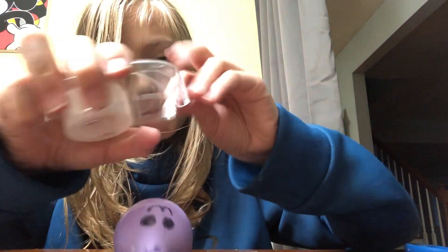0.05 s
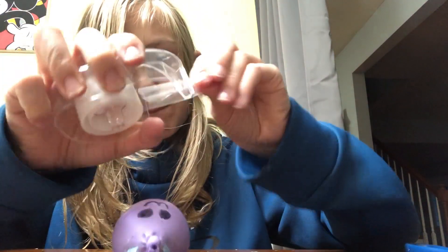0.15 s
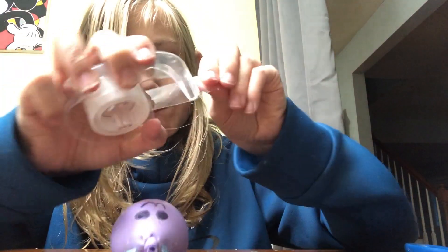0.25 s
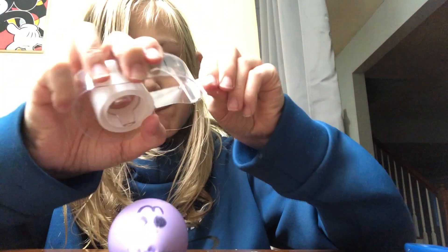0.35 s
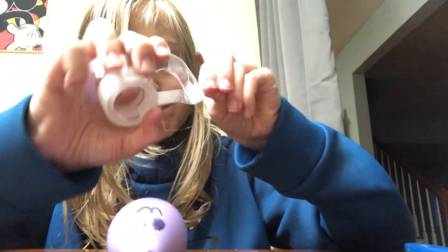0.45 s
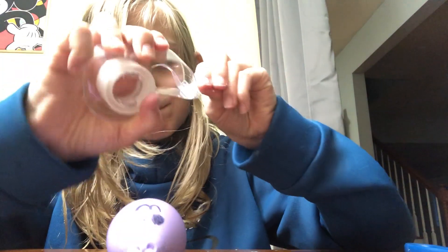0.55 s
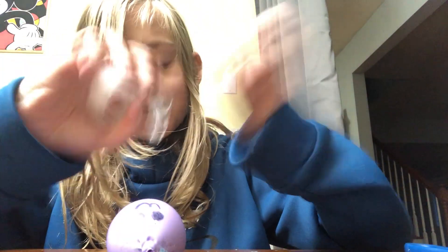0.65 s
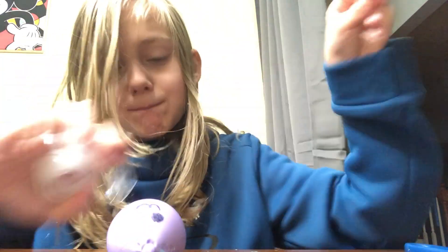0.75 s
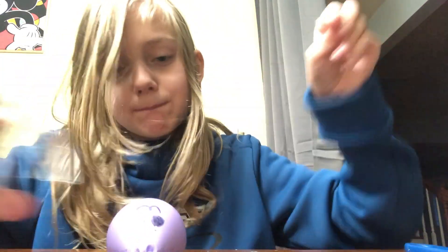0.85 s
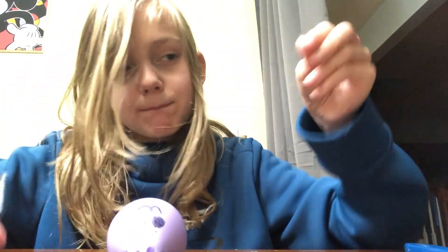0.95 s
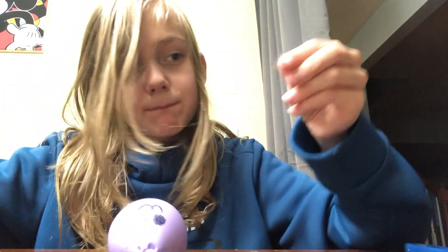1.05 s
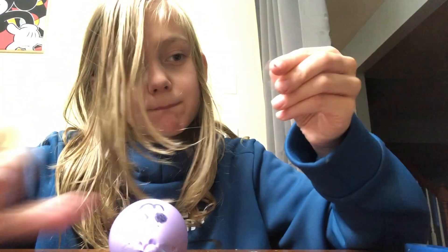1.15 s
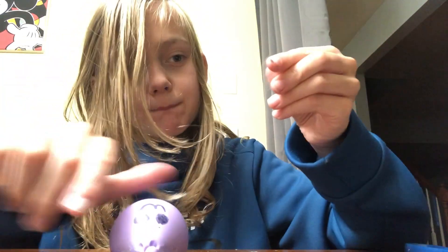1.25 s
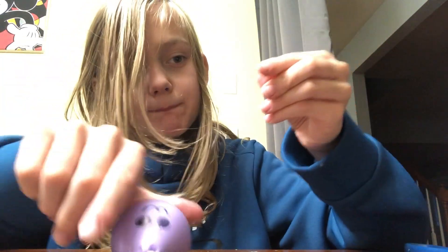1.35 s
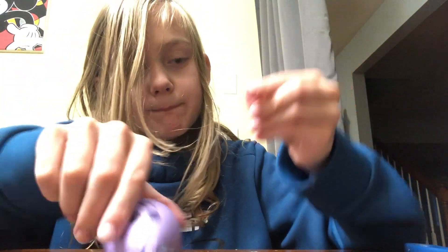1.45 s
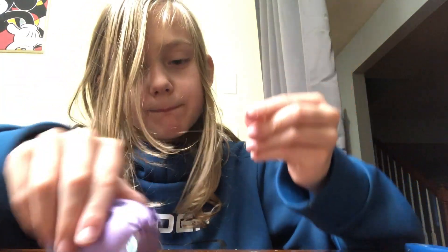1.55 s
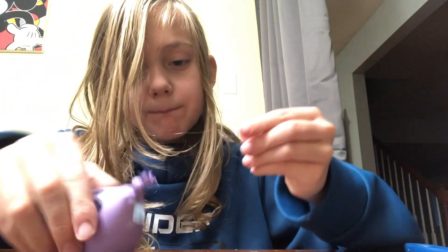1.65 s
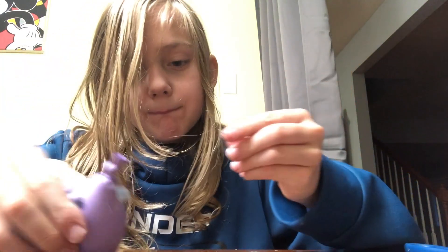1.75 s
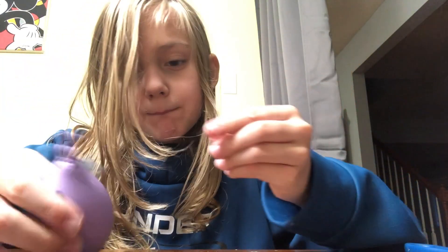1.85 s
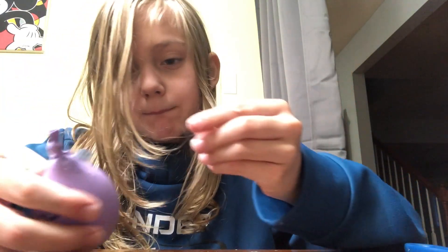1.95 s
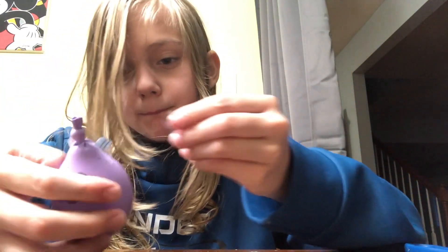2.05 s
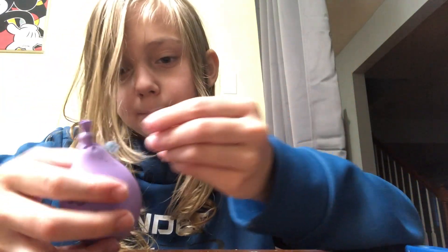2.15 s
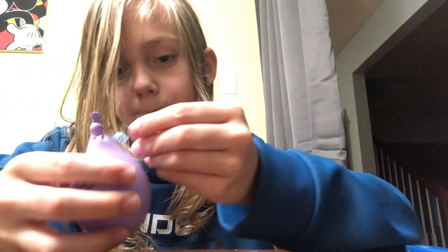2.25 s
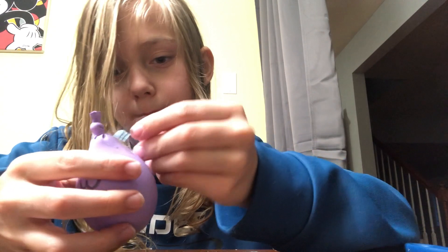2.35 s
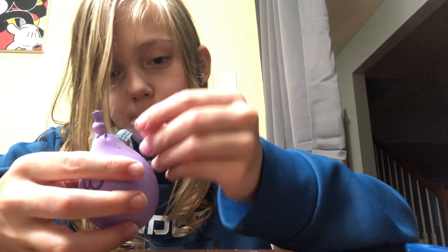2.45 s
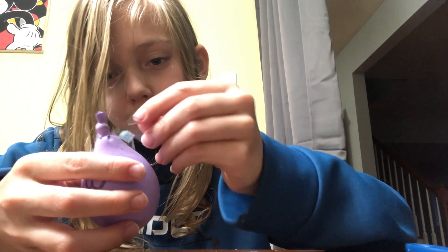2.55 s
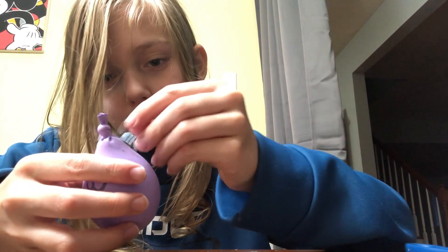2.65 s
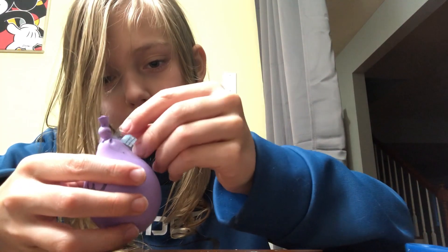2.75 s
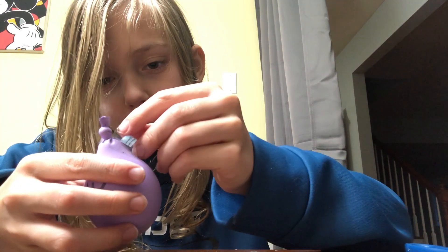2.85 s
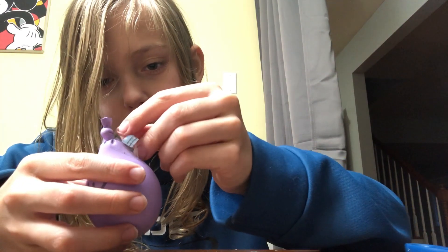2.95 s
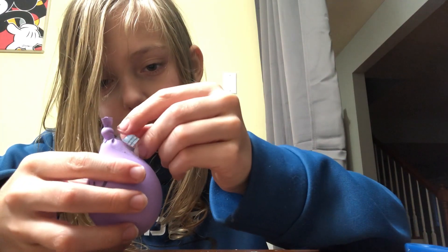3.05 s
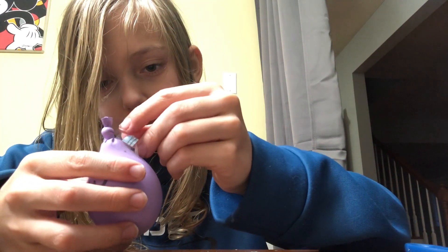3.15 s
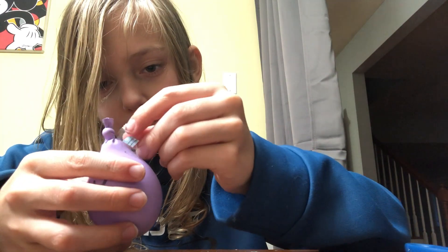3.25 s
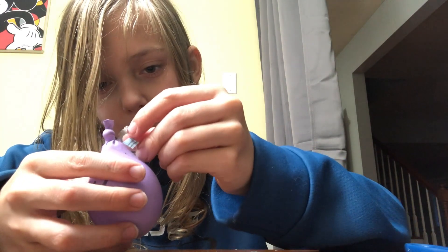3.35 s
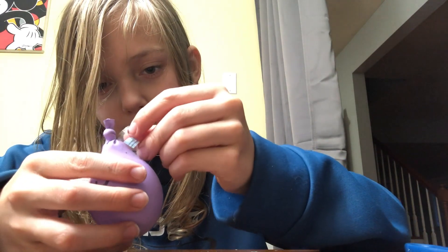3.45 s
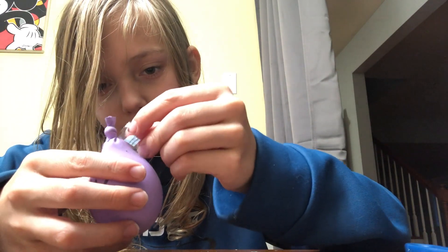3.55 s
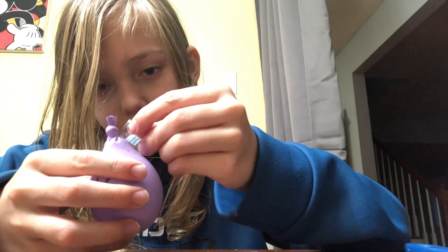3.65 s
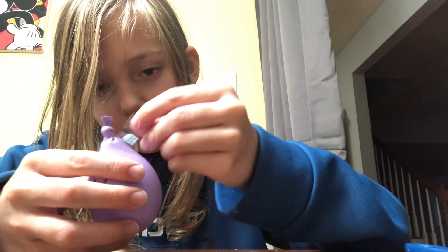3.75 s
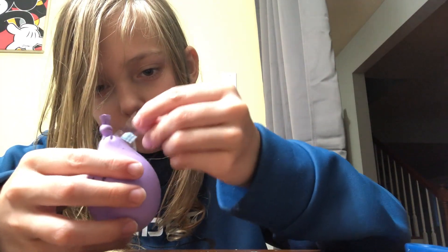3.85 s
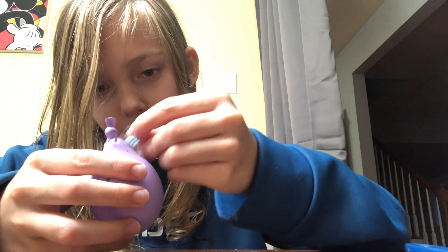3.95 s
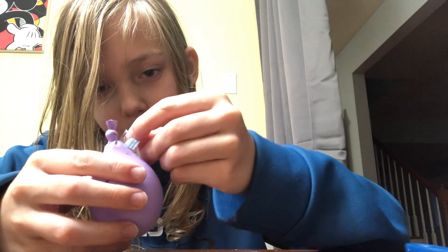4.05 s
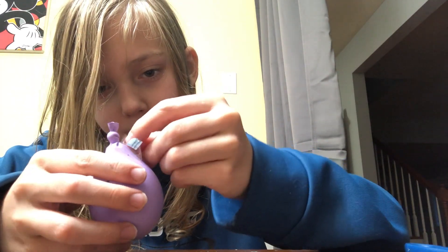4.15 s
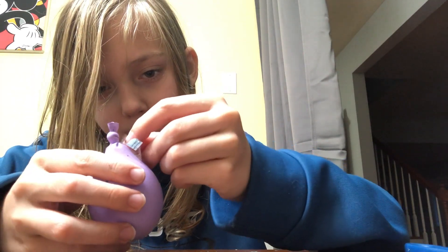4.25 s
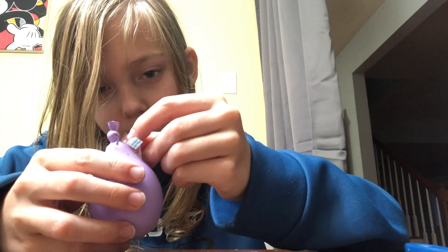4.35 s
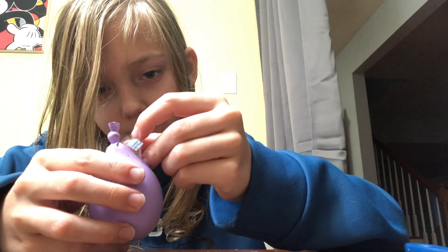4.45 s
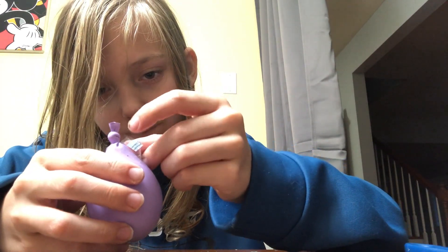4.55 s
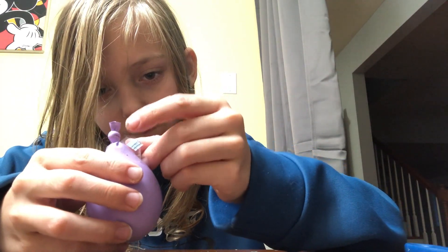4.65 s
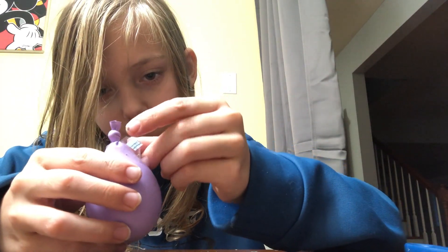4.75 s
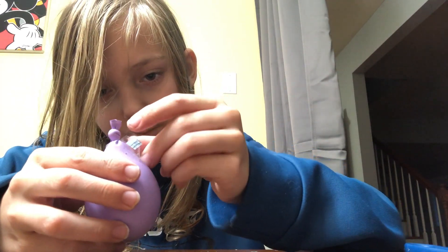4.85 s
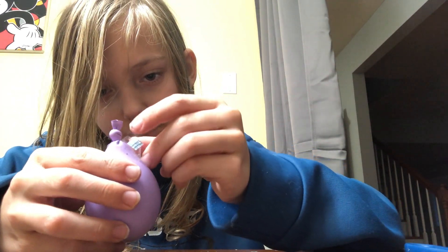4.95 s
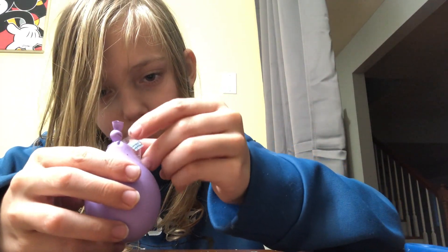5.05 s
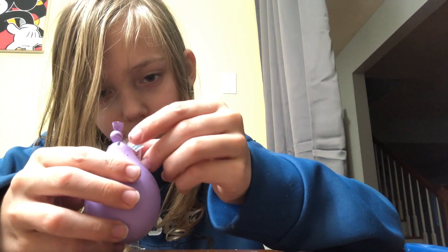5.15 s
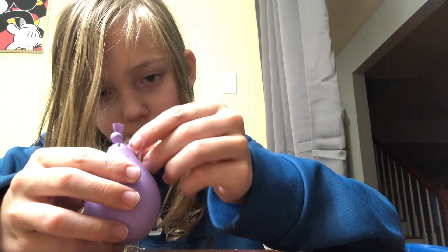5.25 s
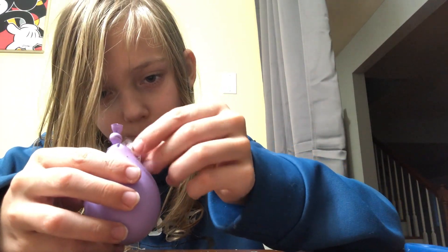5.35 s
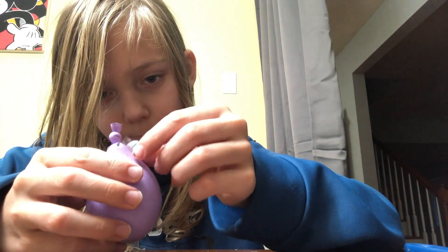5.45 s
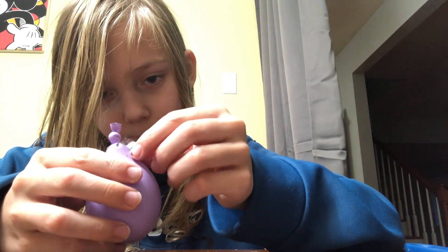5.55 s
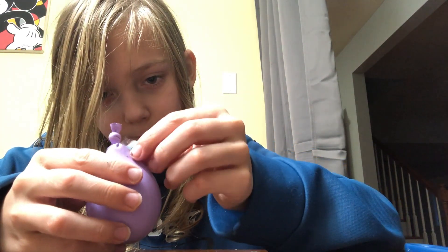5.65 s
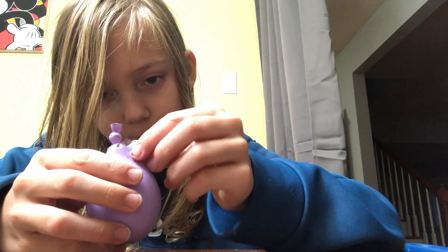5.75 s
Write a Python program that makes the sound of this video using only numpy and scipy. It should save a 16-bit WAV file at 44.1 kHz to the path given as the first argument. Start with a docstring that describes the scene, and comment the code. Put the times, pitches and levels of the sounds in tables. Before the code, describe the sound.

Short crackling squeaks of sticky tape come first, then a bright rip on a metal cutter that the room answers. Low arm rumble, then the hollow dispenser knocks and rocks on the table. The rest is nearly silent: faint air and hum, light finger ticks, crinkling rubs, and a single small snap midway, all heard close to a phone.

```python
"""Close to a phone in a small quiet room with faint air and hum, sticky tape creaks off a plastic dispenser:
fine crackle, and jerks that ring it. It ticks, is tapped, rustles, and tears on the cutter in filtered cracks.
Moving arms give low rumble and boom; the dispenser lands in cracks, ringing shell modes and table thumps.
A sleeve brushes, then fingers press the strip onto a small balloon: ticks, crinkling rubs and one sharp snap."""
import sys
import numpy as np
from scipy import signal
from scipy.fft import rfft, irfft, next_fast_len
from scipy.io import wavfile

SR = 44100
rng = np.random.default_rng(int(sys.argv[2]) if len(sys.argv) > 2 else 0)


def to_wav(sig):
    """Store sig (one row per channel, or 1-D mono) as 16-bit WAV at the path in sys.argv[1].

    Samples outside -1..1 are clipped; the rate is SR.
    """
    pcm = np.clip(np.atleast_2d(sig), -1, 1) * 32767
    pcm = np.round(pcm).astype(np.int16)
    wavfile.write(sys.argv[1], SR, pcm.T)  # frames by channels


N = 255780
TIME_S = np.arange(N) / SR

# still air, relative spectrum: freq_hz, density_db
AIR_COLOUR = [(42, -12), (60, -7.5), (95, -11.5), (130, -7), (200, -8), (250, -6.5), (350, -10.5),
              (480, -11.5), (620, -14), (950, -19), (2500, -25), (7500, -27.5), (8600, -31), (16000, -36.5)]
AIR_DB = -69
# low hum: freq_hz, width_hz, level_db
DRONES = [(66.5, 8, -82), (129.4, 17, -74)]
# reverberation: freq_hz, t60_s
ROOM_T60 = [(150, 0.63), (1000, 0.75), (3500, 0.5), (8000, 0.49), (15000, 0.33)]
ROOM_MODE_HZ = 62  # lowest standing wave

# film peeling on the hollow dispenser: freq_hz, gain_db
PEEL_COLOUR = [(100, -18.5), (500, -10.5), (1400, -13.5), (2200, -6.5), (3000, -1.5), (4200, -8),
               (6400, -10.5), (10000, -16.5), (16000, -24.5)]
# tugs on the roll: start_s, level_db, attack_s, fade_s
PULLS = [(-.005, -40.5, .005, 0.053), (.122, -47.5, .02, 0.033)]
# jerks of the glue: start_s, level_db, ring_hz, film_hiss_db (re ring)
SLIPS = [(.0088, -31, 3127, -13.5), (.0104, -32, 3052, -9), (.072, -42, 2502, -8),
         (.0859, -31, 2756, -11.5), (.1149, -37, 3888, -6), (.118, -39.5, 2448, -4), (.149, -42, 2100, 4),
         (.188, -52, 2700, 0)]
# hiss of the film in a jerk: freq_hz, gain_db
SLIP_FILM_COLOUR = [(400, -5.5), (1000, 1.5), (5000, -2.5), (8000, -2.0), (11000, -12.5), (14000, -30)]

# sticky strip catches and lets go: start_s, level_db, brightness_db_per_band
TICKS = [(0.181, -60, -8.5), (.21, -61, -6), (.236, -52.5, 1), (0.26, -56, -5.5), (0.521, -59, 3),
         (.595, -63.5, -9), (.634, -61, 0.5), (0.99, -64.5, -0.5), (1.224, -54.5, 1.5), (1.431, -62, -3),
         (1.799, -73, 8), (1.8774, -53, -2.5), (3.0736, -63.5, 6), (3.37, -68.5, -4), (3.575, -66.5, -12),
         (3.606, -71.5, -10.5), (3.966, -70, 2.5), (4.1205, -58, 6), (4.1608, -52, -0.5), (4.549, -63, 7.5),
         (4.605, -69.5, -2.5), (4.726, -65.5, -2), (4.951, -74.5, 6.5), (5.402, -67.5, -4.5),
         (5.434, -62, 1), (5.4994, -58, 3), (5.513, -56.5, 2.5), (5.5238, -57, 5), (5.548, -67.5, 7.5),
         (5.688, -69, -5)]
# tick bands: from_hz, to_hz
TICK_BANDS_HZ = [(650, 2400), (2000, 5600), (6800, 12000)]
# level of each band in a neutral tick: low_db, mid_db, high_db
TICK_BAND_DB = (0.5, 0.5, -0.5)
TICK_FADES_S = (.0022, .0014, .001)

# finger taps on hard plastic: start_s, level_db
TAPS = [(0.2655, -53.5), (1.406, -50), (1.605, -55)]
# tapped plastic: freq_hz, level_db, t60_s
TAP_MODES = [(892, -3.5, .025), (1900, -0.5, 0.04), (2150, -7.5, .03), (2700, -2, .035),
             (3159, -6.5, 0.018)]

# faint rustles of the strip, before and after the tear: centre_s, length_s, level_db
RUSTLES = [(.57, .14, -72), (.652, .016, -52.5), (.83, .05, -60.5), (.915, 0.033, -65), (.975, .04, -70),
           (1.22, .16, -68.5)]
# rustling strip: freq_hz, gain_db
STRIP_COLOUR = [(400, -8.5), (1500, -3.5), (3500, 1), (6000, -2.5), (9000, -4.5), (11000, -11), (13500, -5),
                (16000, -8.5)]
# hand and sleeve take up the balloon: centre_s, length_s, level_db
BRUSHES = [(1.445, 0.08, -65), (1.71, 0.16, -68.5), (1.855, 0.073, -70.5)]
# sleeve cloth: freq_hz, gain_db
SLEEVE_COLOUR = [(100, -11.5), (230, 0.5), (500, -3.5), (1500, -11), (4000, -10), (8000, -16),
                 (16000, -32.5)]
# fingertips rub the strip: centre_s, length_s, level_db
RUBS = [(3.474, .08, -72), (4.123, 0.017, -59), (4.435, 0.081, -68.5), (4.53, 0.041, -61),
        (5.401, 0.051, -71.5), (5.514, 0.052, -63)]
# rubbing: freq_hz, gain_db
RUB_COLOUR = [(300, 10.5), (1200, -6), (3000, -5.5), (6000, -12), (8500, 2), (11500, -11.5), (13500, -28),
              (16000, -8)]
# crinkling under the fingertips: freq_hz, gain_db
CRINKLE_COLOUR = [(280, -1), (480, 8), (1200, 0), (3000, 3), (6000, -12), (10000, -6), (14500, -9)]
CRINKLE_DB = -4.5  # re rubbing

# tear across the cutter's teeth: start_s, level_db, fade_s, cutter_ring_db
TEAR = [(.6553, -33.5, 0.00064, -44), (.6559, -12.5, 0.0012, -21), (0.6593, -17, .0022, -25),
        (0.6619, -28, 0.0017, -24.5)]
# tear heard directly: freq_hz, gain_db
TEAR_COLOUR = [(150, -36), (280, -25.5), (500, -3), (750, -8.5), (1100, -10.5), (1750, 1.5), (2700, -1.5),
               (4500, -5), (6000, -3), (8500, 3), (11500, -13), (16000, -13)]
# tear sent to the walls, all directions: freq_hz, gain_db
TEAR_SPREAD_COLOUR = [(200, -9), (600, -2.5), (850, -10), (1400, -6.5), (1850, 0.5), (2500, -1), (3600, 6),
                      (4500, -4.5), (5900, 0), (6900, -3), (8000, -0.5), (10000, -5), (12000, -12),
                      (16000, -14)]
# metal cutter: freq_hz, level_db, t60_s
CUTTER_MODES = [(5930, 1, 0.018), (6100, -3, 0.011), (7400, -0.5, 0.0073), (10185, -9, 0.0042)]

# low rumbles of moving arms and of the hand setting the dispenser down:
# start_s, relative_level_db, attack_s, fade_s
RUMBLES = [(.655, -43.5, .115, .05), (.83, -61, .1, .1), (1.06, -59, .04, .055)]
# rumble: freq_hz, gain_db
RUMBLE_COLOUR = [(40, -16), (60, -6), (90, -9), (125, -0.5), (175, 1.5), (260, -8), (450, -23.5),
                 (1000, -52.5)]

# dispenser lands and rocks: start_s, contact_strength_db
LANDING = [(1.0308, -36), (1.0332, -25.5), (1.034, -36), (1.054, -39.5), (1.0613, -16), (1.065, -26),
           (1.0736, -22.5), (1.082, -21.5), (1.086, -28.5), (1.097, -35.5)]
# contact crack and roll chatter: freq_hz, gain_db
CRACK_COLOUR = [(170, -22), (280, -11.5), (500, -10.5), (1000, -1), (1800, -1.5), (2200, -3.5), (2800, 2.5),
                (4300, 2.5), (5200, -8.5), (7300, -5.5), (9500, -17.5), (12000, -32), (16000, -37)]
# plastic shell: freq_hz, level_db, t60_s
SHELL_MODES = [(1160, -17.5, 0.13), (1590, -17.5, 0.17), (1910, -10.5, 0.24), (2590, -11, .07),
               (2700, -13, 0.099), (2867, -0.5, .08), (2993, -2.5, 0.047), (3090, -3.5, .15),
               (3180, 0, 0.31), (3010, -5, .08), (3587, -11.5, .06), (4036, -11.5, 0.0793),
               (4090, -15, 0.24), (4550, -15.5, 0.41), (4660, -12.5, .2), (5857, -14, 0.042),
               (6380, -10, 0.066), (6957, -18, 0.071)]
# table top: freq_hz, level_db, t60_s
TABLE_MODES = [(183.6, -16, .14), (243.5, -3.5, .17), (300.44, -4.5, 0.1), (391, -4.5, 0.28),
               (458.3, 0, 0.11), (524, -2, .1), (633, -4, .13), (696, 0, 0.14), (794, -6.5, 0.085)]
CHATTER_DB = -7  # roll's rattle, re each crack
SHELL_DB, SHELL_DB_PER_DB = 4.5, 1.7  # ring re hardest crack; growth with strength
THUMP_DB, THUMP_DB_PER_S = -15.5, 200  # re each crack; grows as the weight settles

# strip buckles against the balloon: start_s, level_db, fade_s, balloon_ring_db
SNAP = [(3.7243, -41.5, .001, -49), (3.7265, -29.5, 0.00043, -30), (3.7281, -38, 0.0014, -45)]
# snap heard directly: freq_hz, gain_db
SNAP_COLOUR = [(150, -32.5), (400, -18), (650, -24), (1120, 2), (2000, -24.5), (3000, -13), (4300, -12),
               (6200, -12.5), (7400, -1.5), (10000, -6), (13000, -10.5), (16000, -30)]
# snap sent to the walls, all directions: freq_hz, gain_db
SNAP_SPREAD_COLOUR = [(200, 1), (450, 4.5), (700, -4), (1100, 6), (1500, -10), (1900, 1), (2400, -4),
                      (3000, 3.5), (4400, -6), (5500, 0), (6300, -9), (7200, 2), (9000, -7), (16000, -15)]
# balloon: freq_hz, level_db, t60_s
BALLOON_MODES = [(1130, -7.5, 0.015), (1790, -6, 0.013), (2180, -19.5, 0.0083), (2960, -2, 0.0092),
                 (3520, -9, 0.0097)]

TOP_HZ = 16200  # treble limit of the phone


def undb(db):
    """Decibels to gain."""
    return 10 ** (np.asarray(db) / 20)


def unit(x):
    """Scale to rms 1."""
    return x / np.sqrt(np.mean(x ** 2))


def blow(x):
    """Scale a short sound to the energy of 4 ms at rms 1."""
    return x / np.sqrt(np.sum(x ** 2) / (.004 * SR))


def on_log(hz, points):
    """Read (freq_hz, value) points on a log frequency axis."""
    point_hz, value = np.transpose(points)
    return np.interp(np.log(hz + 1), np.log(point_hz), value)


def colour(x, points):
    """Minimum-phase filter of the given (freq_hz, gain_db) shape, falling off below its first point."""
    size = 2 * next_fast_len(len(x))
    hz = np.arange(size // 2 + 1) * SR / size
    low_cut = np.minimum((hz + 1) / points[0][0], 1) ** 3
    gain = undb(on_log(hz, points)) * low_cut
    # folding the cepstrum makes the filter causal
    cepstrum = irfft(np.log(gain))[:size // 2]
    cepstrum[1:] *= 2
    response = np.exp(rfft(cepstrum, size))
    return irfft(rfft(x, size) * response)[:len(x)]


def add(track, start_s, sound):
    """Mix a sound into the track."""
    start = max(int(start_s * SR), 0)
    track[start:start + len(sound)] += sound[:N - start]


def crack(fade_s, scatter, size=4096):
    """One spike plus a dying surface flutter; scatter is flutter over spike in amplitude (root energy)."""
    t = TIME_S[:size]
    flutter = rng.standard_normal(size) * np.exp(-t / fade_s)
    return (t == 0) + scatter * flutter / np.sqrt(np.sum(flutter ** 2))


def crackle(per_s, spread_db):
    """Random tiny clicks, sizes scattered evenly over a range in dB."""
    hits = rng.random(N) < per_s / SR
    return hits * rng.choice([-1, 1], N) * undb(spread_db * rng.random(N))


def ring(modes, detune, size=22050):
    """Decaying modes, each struck at its peak with random sign and slight relative detuning."""
    t = TIME_S[:size]
    out = np.zeros(size)
    for hz, db, t60_s in modes:
        amplitude = undb(db) * rng.choice([-1, 1])
        struck_hz = hz * (1 + detune * rng.standard_normal())
        out += amplitude * np.cos(2 * np.pi * struck_hz * t) * np.exp(-np.log(1000) * t / t60_s)
    return blow(out)


def strokes(rows):
    """Gain of soft Gaussian strokes: centre_s, length_s, level_db."""
    return sum(undb(db) * np.exp(-(2 * (TIME_S - centre_s) / length_s) ** 2)
               for centre_s, length_s, db in rows)


def surges(rows):
    """Gain of moves that build up linearly, then fade: start_s, level_db, attack_s, fade_s."""
    gain = np.zeros(N)
    for start_s, db, attack_s, fade_s in rows:
        attack = np.clip((TIME_S - start_s) / attack_s, 0, 1)
        fade = np.exp(-np.maximum(TIME_S - start_s - attack_s, 0) / fade_s)
        gain += undb(db) * attack * fade
    return gain


def echoes(x, wet_db, delay_s=.007, early=1.6, early_fade_s=0.038, size=32768):
    """Diffuse noise tail, stronger early on, each band decaying at its own t60."""
    t, hz = TIME_S[:size], np.arange(size // 2 + 1) * SR / size
    centres_hz = np.geomspace(125, 16000, 8)
    noise, tail = rfft(rng.standard_normal(size)), np.zeros(size)
    for centre_hz, own in zip(centres_hz, np.eye(len(centres_hz))):
        band = irfft(noise * np.interp(hz, centres_hz, own))
        tail += band * np.exp(-np.log(1000) * t / on_log(centre_hz, ROOM_T60))
    onset = np.clip(t / delay_s - .5, 0, 1)  # half open at delay_s
    tail = tail * onset * (1 + early * np.exp(-t / early_fade_s))
    return undb(wet_db) * signal.fftconvolve(x, tail / np.sqrt(np.sum(tail ** 2)))[:N]


def room(x, wet_db):
    """Sound plus its echoes."""
    return x + echoes(x, wet_db)


def air():
    """Faint steady room noise; resonated noise gives a wavering low hum."""
    out = undb(AIR_DB) * unit(colour(rng.standard_normal(N), AIR_COLOUR))
    for hz, width_hz, db in DRONES:
        b, a = signal.iirpeak(hz, hz / width_hz, fs=SR)
        out += undb(db) * unit(signal.lfilter(b, a, rng.standard_normal(N)))
    return out


def peeling():
    """Glue threads part in a fine crackle; larger jerks ring the hand-damped dispenser."""
    out = unit(colour(crackle(per_s=8000, spread_db=24.5), PEEL_COLOUR)) * surges(PULLS)
    for start_s, db, hz, hiss_db in SLIPS:
        modes = [(hz, -6, .005), (hz, 0, .006), (hz * 0.96, -3, .005)]
        knock = ring(modes, detune=0.0088, size=4096)
        # gradual build-up narrows the pitch
        knock = blow(knock * (1 - np.exp(-TIME_S[:len(knock)] / 0.00036)))
        film = blow(colour(crack(fade_s=0.00084, scatter=2.6), SLIP_FILM_COLOUR))
        add(out, start_s, undb(db) * (knock + undb(hiss_db) * film))
    return out


def ticks():
    """Brief ticks, dull from the rubber and bright from the film; the lows last longer."""
    out = np.zeros(N)
    for start_s, db, bright_db in TICKS:
        for step, (band_hz, band_db, fade_s) in enumerate(zip(TICK_BANDS_HZ, TICK_BAND_DB, TICK_FADES_S)):
            sos = signal.butter(3, band_hz, "band", fs=SR, output="sos")
            gain = undb(db + band_db + bright_db * (step - 1))
            add(out, start_s, gain * blow(signal.sosfilt(sos, crack(fade_s, scatter=1.6))))
    return out


def taps():
    """A light touch sets the plastic ringing for a moment."""
    out = np.zeros(N)
    for start_s, db in TAPS:
        add(out, start_s, undb(db) * ring(TAP_MODES, detune=.02, size=4096))
    return out


def handling():
    """Rustling film, brushing cloth, then fingertips that scrape and crinkle the strip: shaped crackle."""
    strip = unit(colour(crackle(per_s=6000, spread_db=24.5), STRIP_COLOUR)) * strokes(RUSTLES)
    sleeve = unit(colour(crackle(per_s=6800, spread_db=40), SLEEVE_COLOUR)) * strokes(BRUSHES)
    pressure = strokes(RUBS)
    rubs = unit(colour(crackle(per_s=1800, spread_db=32), RUB_COLOUR)) * pressure
    crinkles = unit(colour(crackle(per_s=450, spread_db=18), CRINKLE_COLOUR)) * pressure
    return strip + sleeve + rubs + undb(CRINKLE_DB) * crinkles


def film_snaps(rows, shape, modes, spread_shape, scatter, wet_db):
    """Taut film gives way in cracks that ring what it lies on; the room answers the strongest."""
    near, spread = np.zeros(N), np.zeros(N)
    for start_s, db, fade_s, ring_db in rows:
        add(near, start_s, undb(db) * blow(colour(crack(fade_s, scatter), shape)))
        add(near, start_s, undb(ring_db) * ring(modes, detune=0.024, size=4096))
    start_s, db, fade_s, _ = max(rows, key=lambda row: row[1])
    add(spread, start_s, undb(db) * blow(colour(crack(fade_s, scatter=0), spread_shape)))
    return near + echoes(spread, wet_db)


def tearing():
    """The tape parts tooth by tooth and the small metal cutter zings."""
    return film_snaps(TEAR, TEAR_COLOUR, CUTTER_MODES, TEAR_SPREAD_COLOUR, scatter=2.3, wet_db=-10.5)


def low_rumbles():
    """Soft noise rumble of moving arms and of the set-down; the room's lowest mode booms along."""
    rumble = unit(colour(rng.standard_normal(N), RUMBLE_COLOUR))
    boom = np.sqrt(2) * np.sin(2 * np.pi * (ROOM_MODE_HZ * TIME_S + rng.random()))
    return (undb(-4.5) * rumble + undb(-3.5) * boom) * surges(RUMBLES)


def landing():
    """Each contact cracks, rings the plastic shell and thumps the table; the loose roll chatters on."""
    out = np.zeros(N)
    first_s, hardest_db = LANDING[0][0], max(db for _, db in LANDING)
    for start_s, crack_db in LANDING:
        shell_db = hardest_db + SHELL_DB + SHELL_DB_PER_DB * (crack_db - hardest_db)
        table_db = crack_db + THUMP_DB + THUMP_DB_PER_S * (start_s - first_s)
        contact = blow(colour(crack(fade_s=0.006, scatter=3.7), CRACK_COLOUR))
        chatter = blow(colour(crack(fade_s=0.008745, scatter=23), CRACK_COLOUR))
        shell = ring(SHELL_MODES, detune=0.00045)
        # table contact takes most of the shell's ring at once
        damping = 0.15 + np.exp(-TIME_S[:len(shell)] / .003)
        add(out, start_s, undb(crack_db) * contact)
        add(out, start_s, undb(crack_db + CHATTER_DB) * chatter)
        add(out, start_s, undb(shell_db) * blow(shell * damping))
        add(out, start_s, undb(table_db) * ring(TABLE_MODES, detune=.03))
    return out


def snapping():
    """The strip flicks against the tight rubber."""
    return film_snaps(SNAP, SNAP_COLOUR, BALLOON_MODES, SNAP_SPREAD_COLOUR, scatter=0.97, wet_db=-17.5)


def scene():
    """All sources, each with its own share of room."""
    tape = room(peeling(), wet_db=-19.0) + tearing() + snapping()
    hands = room(ticks() + taps() + handling(), wet_db=-20) + low_rumbles()
    dispenser = room(landing(), wet_db=-15.5)
    return (air() + tape + hands + dispenser)[None]


def record(dry):
    """The phone rounds the sharpest peaks and cuts the top of the treble."""
    rounded = np.tanh(.8 * dry) / .8
    low_pass = signal.ellip(10, .2, 80, TOP_HZ, fs=SR, output="sos")
    return signal.sosfilt(low_pass, rounded)


dry = scene()
out = record(dry)
to_wav(out)
```